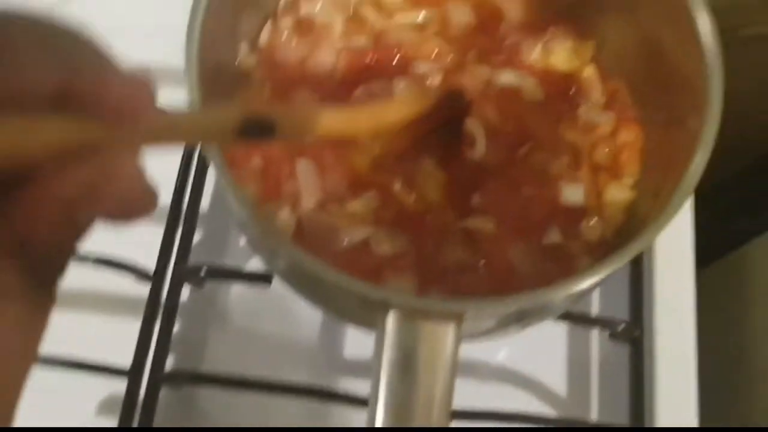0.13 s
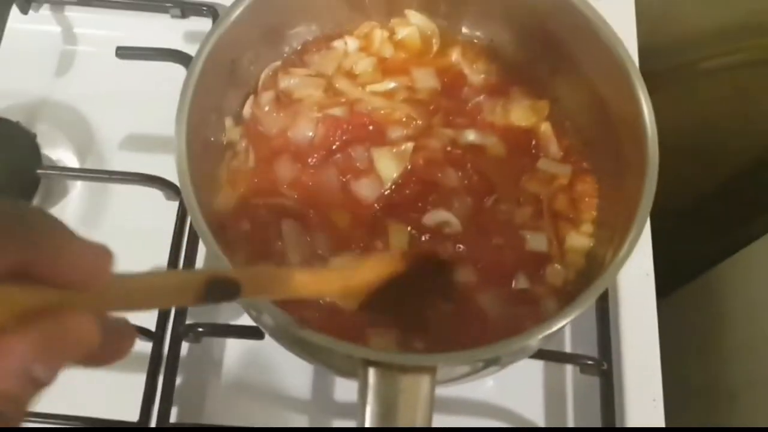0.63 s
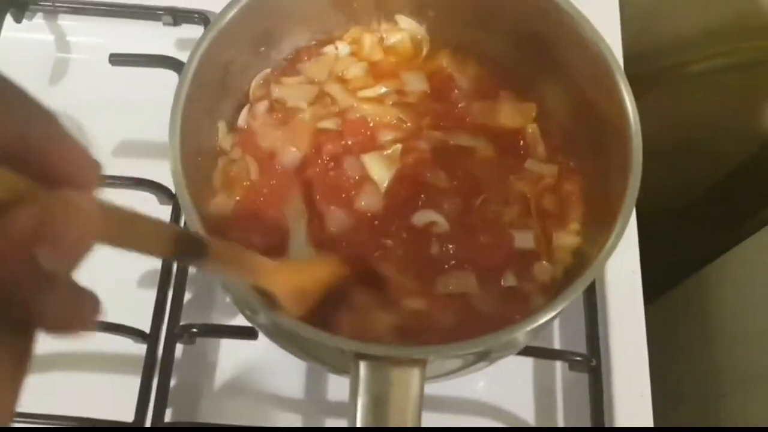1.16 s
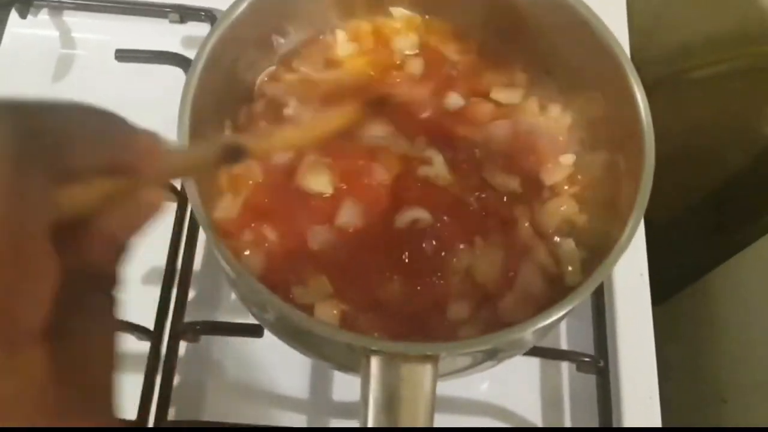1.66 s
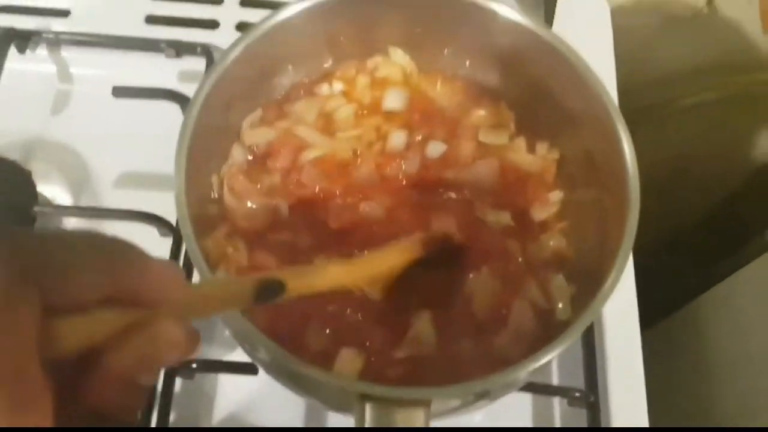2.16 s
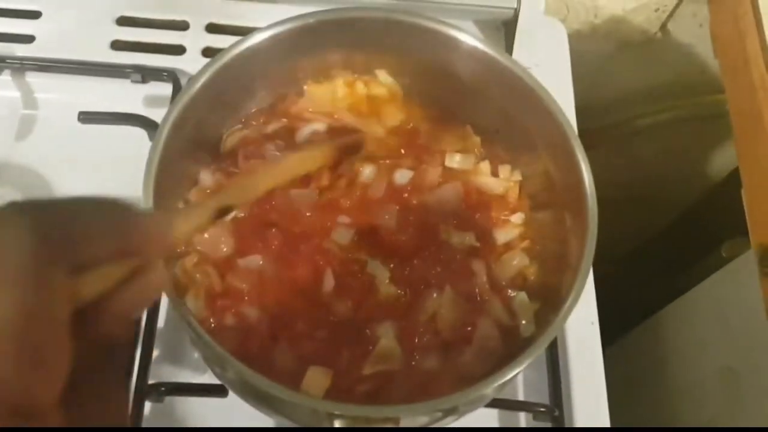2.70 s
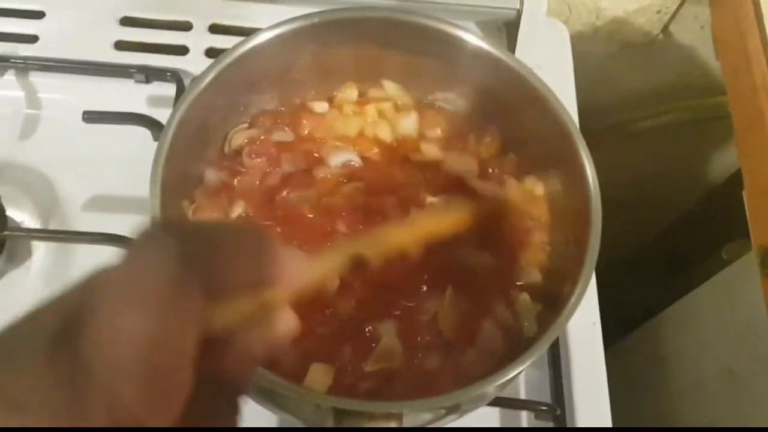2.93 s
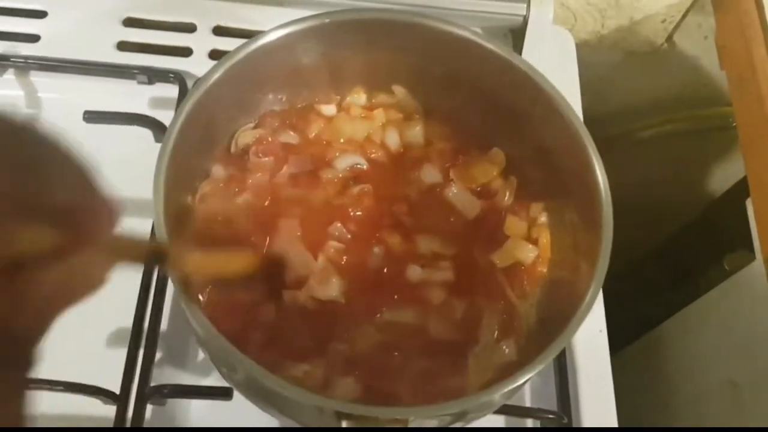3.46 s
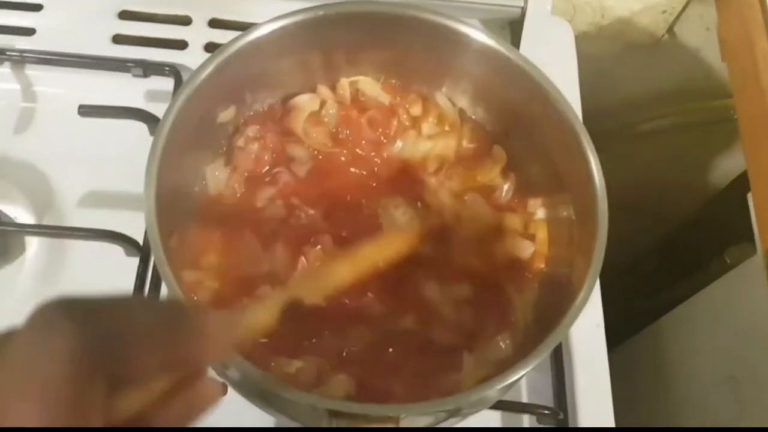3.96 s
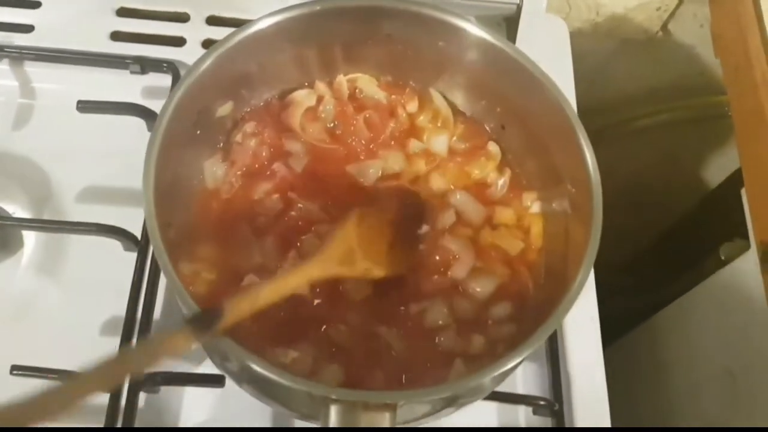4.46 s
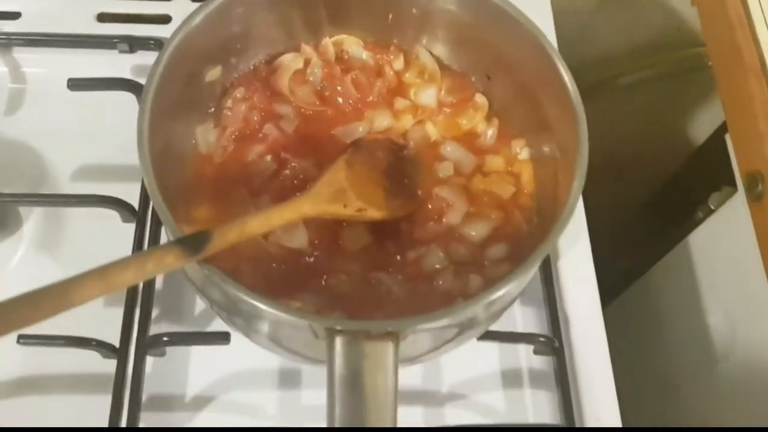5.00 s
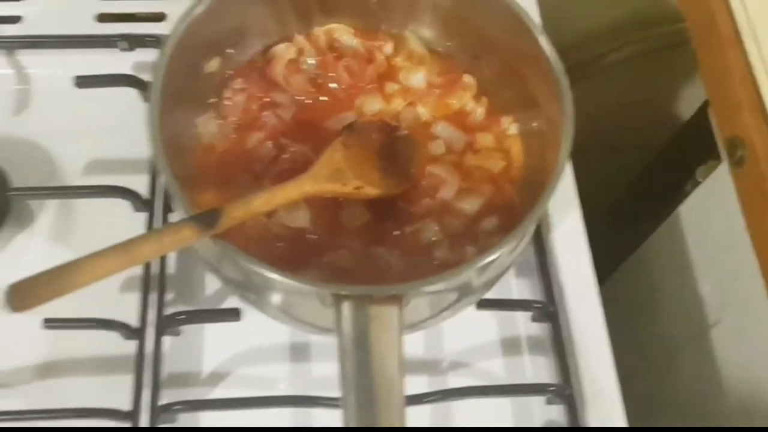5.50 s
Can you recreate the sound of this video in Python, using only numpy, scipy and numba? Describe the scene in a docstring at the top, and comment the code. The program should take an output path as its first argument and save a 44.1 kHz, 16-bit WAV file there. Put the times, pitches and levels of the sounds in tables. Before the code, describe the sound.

Onion and tomato sauce fries in a steel saucepan on a gas ring, close up in a small kitchen. A quiet crackly simmer is stirred with a wooden spoon; steam surges loudly around two seconds and again past three. Small knocks, short gritty scrapes and sharp spits come between. Near the end the spoon drops on the rim, clacks and bounces, and the simmer calms. Stereo, treble wide and differing between sides.

```python
"""Frying in a steel saucepan

Onions and tomatoes fry on a gas ring: bursts of noise make hiss and crackle, gliding sines the oil bubbles.
Where the spoon bares the hot floor, steam hisses and bubbles burst faster; water drops spit as short noise.
Big bubbles puff into the ringing pan air, others whistle; the spoon knocks (decaying modes) and rasps.
Filtered noise is the flame; two microphones face different ways and colour the treble differently."""
import sys
import numpy as np
from scipy import signal
from scipy.fft import rfft, irfft, next_fast_len
from scipy.io import wavfile
from scipy.ndimage import uniform_filter1d
from numba import njit

SR = 44100
rng = np.random.default_rng(int(sys.argv[2]) if len(sys.argv) > 2 else 0)


def volts_from_db(level):
    """Convert decibel levels to linear amplitude ratios."""
    exponent = np.asarray(level, float) / 20
    return 10 ** exponent


def to_wav(sig):
    """Store sig (one row per channel, or 1-D mono) as 16-bit WAV at the path in sys.argv[1].

    Samples outside -1..1 are clipped; the rate is SR.
    """
    pcm = np.clip(np.atleast_2d(sig), -1, 1) * 32767
    pcm = np.round(pcm).astype(np.int16)
    wavfile.write(sys.argv[1], SR, pcm.T)  # frames by channels


N = 247842


def level(x, db):
    """Scale to an rms in dB."""
    return x * volts_from_db(db) / np.sqrt(np.mean(x ** 2))


def curve(table, hz):
    """Interpolate a table on a log-frequency axis."""
    f, v = np.transpose(table)
    return np.interp(np.log(np.maximum(hz, 1)), np.log(f), v)


def colour(x, table):
    """Causal minimum-phase filter from (f/Hz, gain/dB) points, through the folded cepstrum."""
    size = 4096
    cepstrum = irfft(np.log(volts_from_db(curve(table, np.fft.rfftfreq(size, 1 / SR)))))
    cepstrum[1:size // 2] *= 2
    cepstrum[size // 2 + 1:] = 0
    impulse = irfft(np.exp(rfft(cepstrum)))
    return signal.fftconvolve(np.atleast_2d(x), impulse[None], axes=1)[:, :N]


def band(x, lo_hz, hi_hz):
    """Butterworth band-pass."""
    sos = signal.butter(2, [lo_hz, min(hi_hz, SR / 2.1)], "band", fs=SR, output="sos")
    return signal.sosfilt(sos, x)


def pair():
    """White noise at two microphones: alike in the bass, nearly unrelated in the treble."""
    # left-right likeness: f/Hz, correlation
    alike = [(30, 0.89), (130, 0.97), (600, 0.8), (1300, 0.87), (2000, 0.14), (15000, 0.039)]
    size = next_fast_len(N)
    a, b = rfft(rng.standard_normal((2, size)))
    c = np.clip(curve(alike, np.fft.rfftfreq(size, 1 / SR)), 0, 1)
    return irfft(np.array([a, c * a + np.sqrt(1 - c ** 2) * b]), size)[:, :N]


def walk(rate_hz):
    """Random control held 1 / rate_hz s and smoothed twice; spread near 1."""
    k = int(SR / rate_hz)
    held = np.repeat(rng.standard_normal(N // k + 1), k)
    return 1.3 * uniform_filter1d(uniform_filter1d(held, k), k)[:N]


def bursts(per_s, spread_db, tail_s):
    """Envelope of scattered bursts, most small and a few larger, each dying in tail_s."""
    chance, big = rng.random((2, N))
    power = (chance < per_s / SR) * volts_from_db(-2 * spread_db * np.log(1.02 - big))
    return np.sqrt(signal.lfilter([1], [1, -np.exp(-2 / (tail_s * SR))], power) + 1e-12)


def add(out, x, s):
    """Mix x in at time s."""
    i = int(s * SR)
    out[:, i:i + x.shape[-1]] += x[..., :N - i]


def flame():
    """The gas ring's soft roar: coloured noise, fluttering a little."""
    # gas ring and kitchen spectrum: f/Hz, relative density/dB
    roar = [(25, -32), (48, -6.5), (80, -3), (200, -6), (440, -9.5), (800, -5.5), (1500, -7), (3000, -22)]
    flutter_db = 2.0 * walk(2.99) + 0.31 * walk(14.0)
    return level(colour(pair(), roar), -58) * volts_from_db(flutter_db)


def lag(x, late_s):
    """Follow a control late (one pole), from its first value on."""
    keep = np.exp(-1 / (late_s * SR))
    return x[0] + signal.lfilter([1 - keep], [1, -keep], x - x[0])


def patches(x, lo_hz, hi_hz, count, own_db, rate_hz):
    """Overlapping narrow bands, each swelling on its own: patches of the pan floor boil at different sizes."""
    size = next_fast_len(N)
    hz = np.fft.rfftfreq(size, 1 / SR)
    place = count * np.log(hz / lo_hz + 1e-9) / np.log(hi_hz / lo_hz)  # band index on a log axis
    whole = rfft(x, size)
    out = 0
    for k in range(count + 1):
        part = irfft(whole * np.maximum(1 - abs(place - k), 0), size)[:, :N]
        out = out + part * volts_from_db(own_db * walk(rate_hz))
    return out


@njit
def sing(start, hz, cycles, glide, size, n, sr):
    """Each bubble is a dying sine that glides up as it nears the surface."""
    out = np.zeros((2, n))
    for g in range(len(start)):
        z, w = 1. + 0j, 2 * np.pi * hz[g] / sr
        fade = hz[g] / (cycles[g] * sr)
        for i in range(start[g], min(n, start[g] + int(5 / fade))):
            z *= np.exp(1j * w - fade)
            w *= 1 + glide * fade
            out[0, i] += size[0, g] * z.imag
            out[1, i] += size[1, g] * z.real
    return out


def bubbles(per_s, centre_hz, octaves, cycles, spread_db, glide):
    """Ringing bubbles all over the pan, their pitch scattered round a moving centre; rms 1."""
    when, big, life, side, *pitch = rng.random((int(per_s * N / SR), 7)).T
    start = (when * N).astype(int)
    hz = centre_hz[start] * 2 ** (octaves * (sum(pitch) - 3 / 2))
    side_db = np.array([[6], [-6]]) * (side - 1.0)
    size = volts_from_db(-spread_db * np.log(1.02 - big) + side_db) / np.sqrt(cycles * life + 1)
    return level(sing(start, hz, 3 + cycles * life ** 2, glide, size, N, SR), 0)


def pan_air(x, swing_db):
    """The air in the pan rings; the low and high half of each mode swell apart, so its pitch wanders."""
    # air modes: f/Hz, width/Hz, level/dB
    air_modes = [(783, 263, 0), (1490.5, 235, 5.5), (2200, 335, -3.5), (1021, 1537, -3.5)]

    def half(lo_hz, hi_hz):
        return volts_from_db(swing_db * walk(24)) * band(x, lo_hz, hi_hz)

    return sum(volts_from_db(db) * (half(f, f + w / 2) - half(f - w / 2, f)) for f, w, db in air_modes)


def frying():
    """Three sizes of steam: fine hiss, bubbling in the oil, slow plops in the sauce that ring the air in the pan."""
    # oil bubbling as the spoon bares the hot floor and the sauce slides back: t/s, level/dB
    stir = [(0.0, -45), (0.48, -43.5), (0.7, -46.5), (1.04, -47.5), (1.16, -44.5), (1.66, -45), (1.71, -36),
            (1.77, -30.5), (1.98, -26.5), (2.08, -28), (2.25, -35.5), (2.53, -37), (2.57, -39.5),
            (2.8, -38), (2.92, -41), (2.97, -36.5), (3.16, -36.5), (3.29, -29), (3.4, -32.5), (3.71, -32.5),
            (3.99, -45.5), (4.07, -38.5), (4.19, -36), (4.42, -45), (4.57, -32), (4.69, -34), (4.89, -45.5),
            (5.62, -51)]
    # spoon ploughing the sauce, raising plops and pan shake: t/s, gain/dB
    plough = [(0, 3.5), (.9, 3.5), (1.6, 7), (2.1, 3.5), (2.4, -1.5), (2.9, 1.5), (3.1, 3), (3.8, 0),
              (4.1, 2.5), (4.6, 3.5), (4.72, -4.5), (4.85, 6.5)]
    # fine hiss against the bubbling: t/s, gain/dB
    hiss_gain = [(1.75, 0), (1.97, -1.5), (2.05, 1.5), (2.9, 0.5), (3.05, -1.5), (3.24, -0.5), (3.3, 0),
                 (3.56, 1), (3.7, -1), (4.5, 0), (4.68, 2), (4.85, 0)]
    t = np.arange(N) / SR
    calm_db = -46  # sauce covers the floor
    heat_db = np.interp(t, *np.transpose(stir)) - calm_db
    plough_db = np.interp(t, *np.transpose(plough))
    hiss_db = np.interp(t, *np.transpose(hiss_gain))
    # against the oil: the sauce's plops rise and fall about half as much, in dB
    simmer_db = -5.5 - 0.4222 * heat_db + plough_db
    # bubbles get smaller and higher the longer the floor is bare
    centre_hz = 3613 * 2 ** (0.04 * lag(heat_db, late_s=0.3025))

    # one patchy crackle shapes every size, so the bands flare together
    crackle = level(bursts(1100, spread_db=1.3, tail_s=0.011), 0) * volts_from_db(1.74 * walk(60))
    ticks = level(bursts(340, spread_db=1.9, tail_s=0.0004), -8)
    fizz = pair() * (crackle + ticks)
    hiss = level(patches(fizz, 7290, 16530, count=5, own_db=2.0, rate_hz=20), 0.5) * volts_from_db(hiss_db)
    oil = level(patches(fizz, 1977, 6390, count=14, own_db=3.0, rate_hz=30), -7.5)
    oil += level(bubbles(1500, centre_hz, octaves=1.1, cycles=49.5, spread_db=3.5, glide=0.0174), -9.5)
    sauce = np.sqrt(crackle) + level(bursts(130, spread_db=3.1, tail_s=0.0031), -3.0)
    air = level(pan_air(pair() * sauce, swing_db=3.5), -4.5) * volts_from_db(simmer_db)
    # the dragged spoon shakes the pan on its grate
    drag_db = 7.6 * walk(14) + plough_db - 0.72 * heat_db
    drag = level(band(pair(), 57, 250), -25.5) * volts_from_db(drag_db)
    return (hiss + oil + air + drag) * volts_from_db(calm_db + heat_db)


def in_pan(x):
    """What bursts on the floor also rings the air between the walls, each mode varying as the boiling moves."""
    # air modes across the pan: f/Hz, width/Hz, level/dB
    across = [(2125, 50, -8), (2494, 84, -7.5), (3598, 90, -2), (4367, 99, -3)]
    return x + sum(volts_from_db(db + 3.5 * walk(19)) * band(x, f - w / 2, f + w / 2) for f, w, db in across)


def crack(fast_s, slow_s):
    """A sharp broad crack and its short echo round the pan, unlike at the two microphones."""
    t = np.arange(SR // 20) / SR
    echo_share = 0.16
    return rng.standard_normal((2, len(t))) * (np.exp(-t / fast_s) + echo_share * np.exp(-t / slow_s))


def spits():
    """Drops of water burst in the oil: cracks in three bands."""
    # drops: t/s, low level/dB, middle level/dB, high level/dB (rms of first 4 ms, before the pan rings)
    drops = [(0.364, -39.5, -35.5, -33.5), (0.4703, -41, -34.5, -33.5), (0.5022, -58, -40, -36),
             (1.214, -45, -38.5, -38), (2.647, -39, -30.5, -32), (2.956, -51, -42, -34),
             (3.0352, -42, -34, -39), (3.225, -41, -53, -34.5), (3.985, -48, -43, -39),
             (4.0573, -35, -36.5, -34), (4.073, -39, -38, -42), (4.436, -59, -58, -31),
             (5.048, -60.5, -57, -44.5), (5.17, -54.5, -51, -51)]
    # low, middle, high band: lower f/Hz, upper f/Hz
    drop_bands = [(1380, 1680), (3000, 8000), (11000, 16000)]
    out = np.zeros((2, N))
    for s, *levels_db in drops:
        pop = crack(fast_s=0.0012, slow_s=0.006)
        for (lo_hz, hi_hz), db in zip(drop_bands, levels_db):
            part = band(pop, lo_hz, hi_hz)
            onset_rms = np.sqrt(np.mean(part[:, :SR // 250] ** 2))
            add(out, part * volts_from_db(db) / onset_rms, s)
    return out


def whistles():
    """Single bubbles sing out above the fry: brief thin tones that swell and fade."""
    # tones: t/s, f/Hz, envelope peak/dB, swell/s
    tones = [(1.031, 2460, -46, 0.0047), (1.543, 1307, -44, 0.0088), (1.55, 1760, -46.5, .007),
             (2.869, 2430, -46, 0.0075), (3.595, 2090, -36.5, 0.0063), (4.178, 4240, -36.5, 0.0014),
             (4.298, 4070, -28, 0.00065), (4.488, 4240, -35.5, 0.0013), (4.568, 4100, -24.5, 0.00092)]
    out = np.zeros((2, N))
    t = np.arange(SR // 10) / SR
    for s, hz, db, swell_s in tones:
        envelope = t / swell_s * np.exp(1 - t / swell_s)
        add(out, volts_from_db(db) * (envelope * np.sin(2 * np.pi * hz * t))[None], s)
    return out


def plops():
    """A big bubble bursts in the sauce: one short puff rings the air of the pan."""
    # bursts: t/s, peak/dB
    big_bubbles = [(1.035, -37.5), (1.076, -38), (1.175, -36), (2.506, -36.5), (2.773, -36), (2.978, -37),
                   (3.058, -33), (3.079, -33)]
    out = np.zeros((2, N))
    puff = pan_air(np.exp(-np.arange(N) / SR / 0.000084), swing_db=0)[None, :SR // 10]
    for s, db in big_bubbles:
        add(out, volts_from_db(db) * puff / np.abs(puff).max(), s)
    return out


def modes(table, rise_s, weight=1):
    """One blow: decaying sines that start together, each a little stronger or weaker by chance, peak 1."""
    hz, db, t60_s = np.transpose(table)[:, :, None]
    t = np.arange(SR) / SR
    struck_db = db + 2 * rng.standard_normal(hz.shape) - 60 * t / t60_s
    x = (weight * volts_from_db(struck_db) * np.sin(2 * np.pi * hz * t)).sum(0) * (1 - np.exp(-t / rise_s))
    return x / np.abs(x).max()


def knocks():
    """Wood clacks at once, the pan rocks on its grate a moment later; on the rim the steel wall rings too."""
    # spoon on floor and side of the pan: thump t/s, thump peak/dB, thump f/Hz, clack peak/dB
    blows = [(1.323, -37, 320, -25.5), (1.361, -43, 139, -63), (1.549, -47, 387, -33),
             (1.973, -33.5, 204, -30.5), (2.049, -49, 119, -48), (3.478, -44, 323, -35.5),
             (3.53, -46.5, 124, -33), (3.754, -44.5, 218, -38), (4.447, -47.5, 166, -41),
             (4.7538, -33, 191, -25.5), (4.803, -41, 263, -31), (4.815, -36, 176, -34)]
    # handle drops on the rim and bounces: t/s, reference level/dB
    rim_blows = [(4.7500, -13), (4.7987, -17.5), (4.825, -30), (4.85, -24)]
    # pan on its grate: f/Hz, relative level/dB, t60/s
    thump_modes = [(50.4, -14, 0.19), (124, -1.5, 0.28), (155.8, -10.5, 0.43), (188.4, -2, 0.21),
                   (263, -8.5, 0.26), (321, 2.5, 0.16)]
    # wood: f/Hz, relative level/dB, t60/s
    clack_modes = [(813, -0.5, 0.024), (1150, -1, 0.0049)]
    # steel wall: f/Hz, relative level/dB, t60/s
    wall_modes = [(824, -20, .5), (1124, -21, 1.9), (1270, -19, .4), (1534, -11, .07), (4317, -8, .04),
                  (5490, -5, .05), (5539, -7, .17), (6200, -11, .07)]
    out = np.zeros((2, N))
    for s, db, hz, clack_db in blows:
        # a blow wakes the low modes near its own pitch most
        near = np.exp(-(np.log(np.array(thump_modes)[:, :1] / hz) / 0.28) ** 2) + 0.37
        add(out, volts_from_db(db) * modes(thump_modes, 0.0077, near)[None], s)
        add(out, volts_from_db(clack_db) * modes(clack_modes, 0.00015)[None], s - 0.003)
    t = np.arange(SR // 2) / SR
    for s, db in rim_blows:
        add(out, volts_from_db(db - 11.0) * modes(wall_modes, 0.00044)[None], s)
        add(out, volts_from_db(db) * level(band(crack(0.002, 0.014), 640, 6300), -27.5), s)
        # the stove top rattles on under the pan
        rattle = band(pair()[:, :SR // 2], 130, 360) * np.exp(-t / 0.07)
        add(out, level(rattle, db - 43), s)
    return out


def scrapes():
    """Wood sticks and slips on bare steel: gritty noise in a narrow band at the stroke's pitch."""
    # strokes of the spoon's edge: t/s, length/s, f/Hz, level/dB
    strokes = [(1.83, 0.04, 4900, -39.5), (1.904, 0.017, 4370, -31), (1.967, 0.05, 5900, -34.5),
               (3.27, 0.051, 4400, -38.5), (3.621, 0.097, 5500, -39.5), (3.73, 0.025, 5570, -43)]
    t = np.arange(N) / SR
    grit = pair() * level(bursts(600, spread_db=1.5, tail_s=0.0057), 0)
    out = np.zeros((2, N))
    for s, long_s, hz, db in strokes:
        gate = np.clip(np.minimum(t - s, s + long_s - t) / 0.0035, 0, 1)  # 3.5 ms ramps
        out += level(band(grit, hz / 1.03, hz * 1.12), db) * gate
    return out


def scene():
    """Everything in and under the pan."""
    return in_pan(frying() + spits()) + plops() + scrapes() + whistles() + knocks() + flame()


def band_limit(x):
    """A steep low-pass at the top of the band."""
    return signal.sosfilt(signal.butter(12, 16990, fs=SR, output="sos"), x)


def record(dry):
    """Each microphone port has its own resonances; the top is cut steeply."""
    # port responses: f/Hz, gain/dB
    left_port = [(300, 3.5), (1000, 1.5), (2000, -2), (3000, 5), (7000, 0), (12000, 4), (15500, -1.5)]
    right_port = [(100, 6), (500, 2.5), (1500, 8), (2500, 7.5), (3300, 7.5), (4300, 11.5), (6200, 10),
                  (7000, 2.5), (9800, -1.5), (11000, 1), (12300, 13.5), (13800, 4.5), (14800, 10),
                  (15600, 4)]
    x = np.vstack([colour(dry[0], left_port), colour(dry[1], right_port)])
    x = signal.sosfilt(signal.ellip(10, 0.3, 52, 15800, fs=SR, output="sos"), x)
    return band_limit(x)


dry = scene()
out = record(dry)
to_wav(out)
```